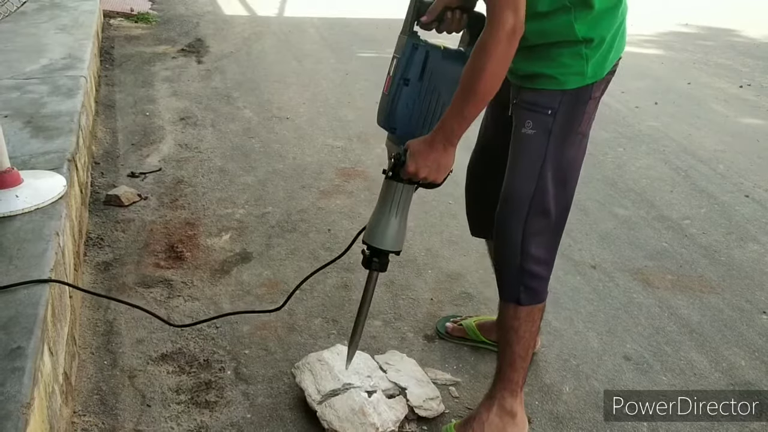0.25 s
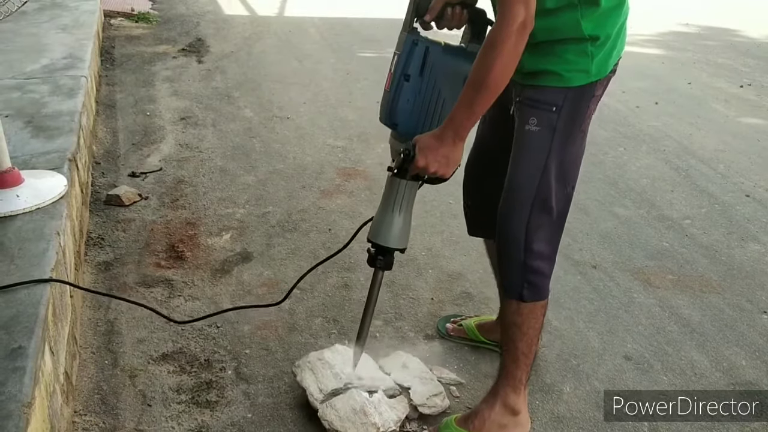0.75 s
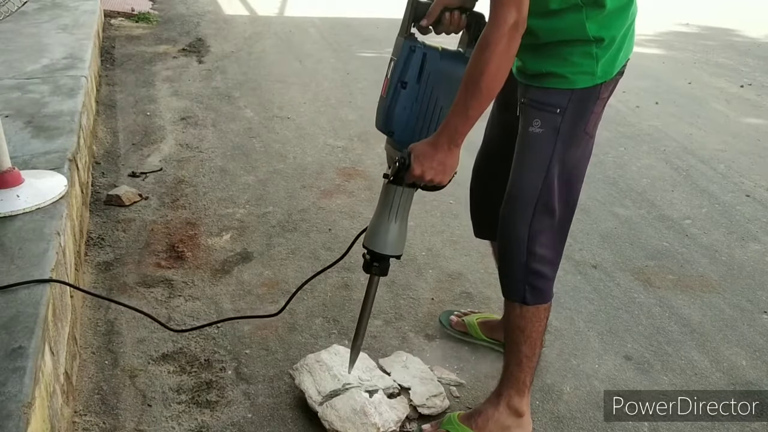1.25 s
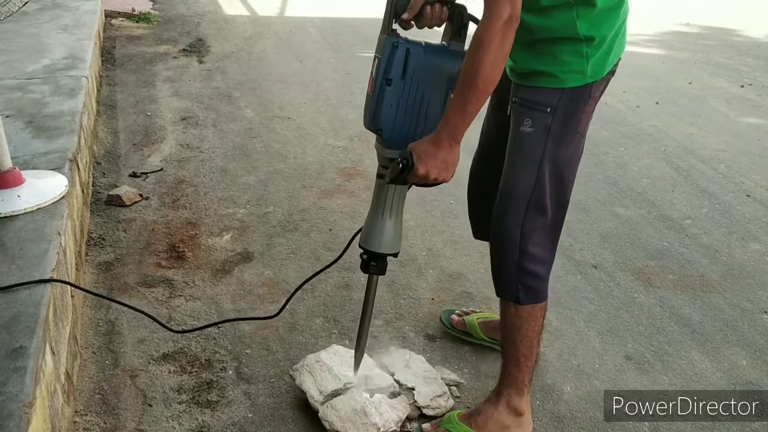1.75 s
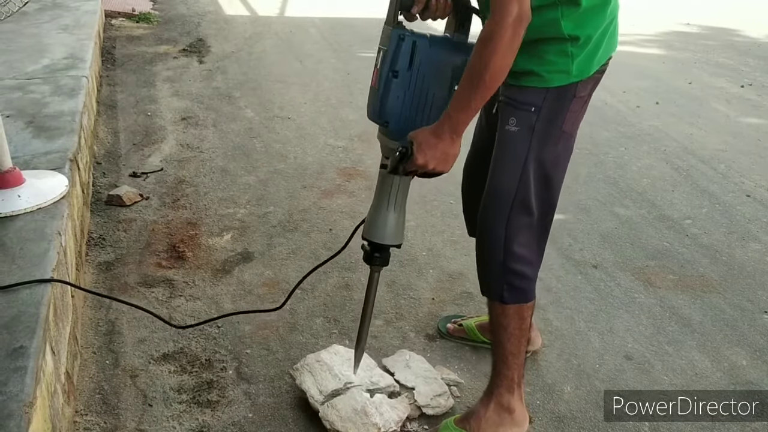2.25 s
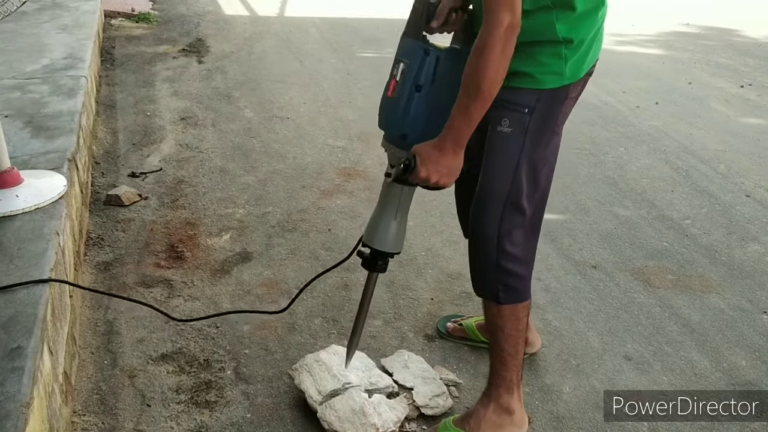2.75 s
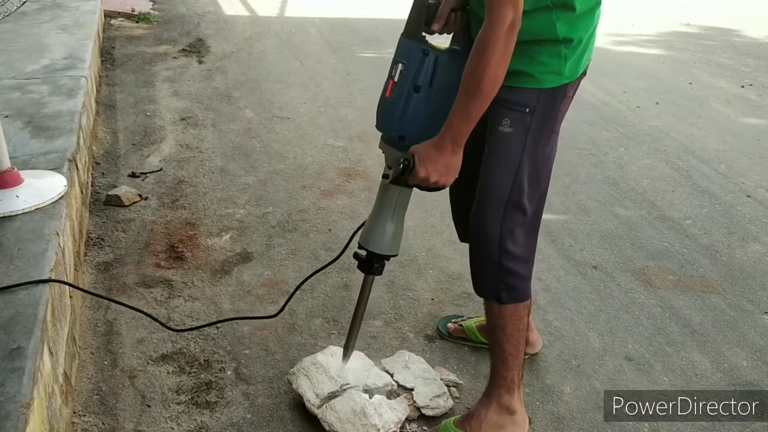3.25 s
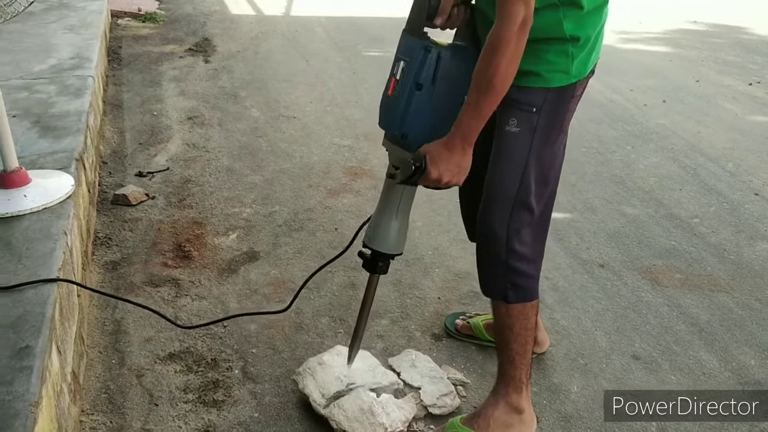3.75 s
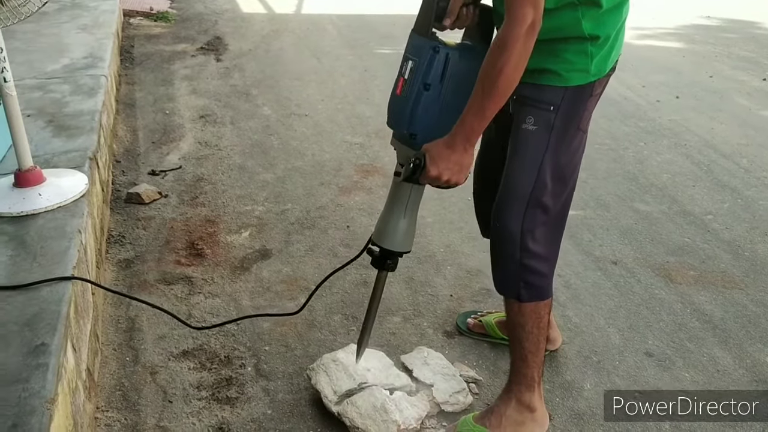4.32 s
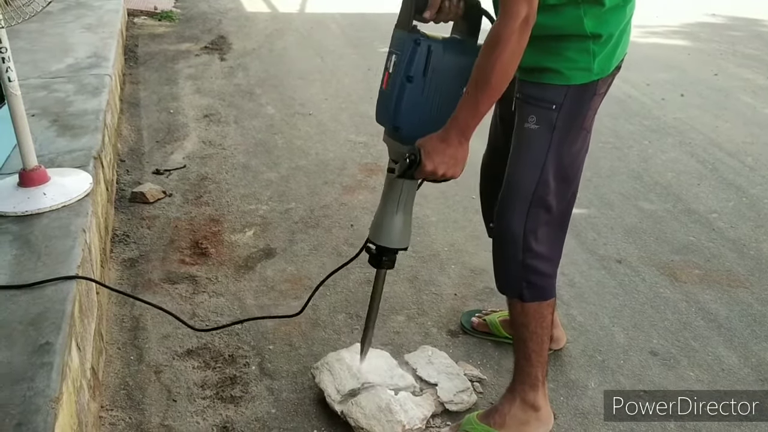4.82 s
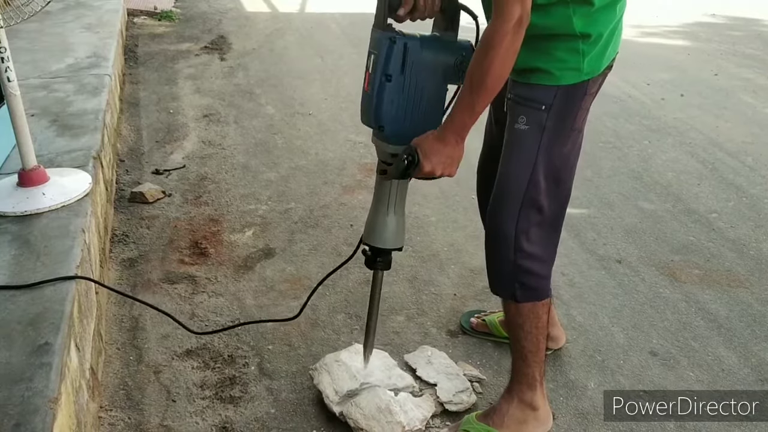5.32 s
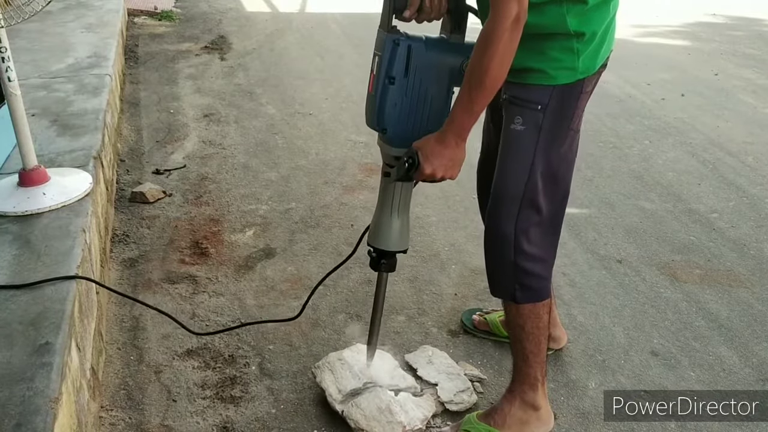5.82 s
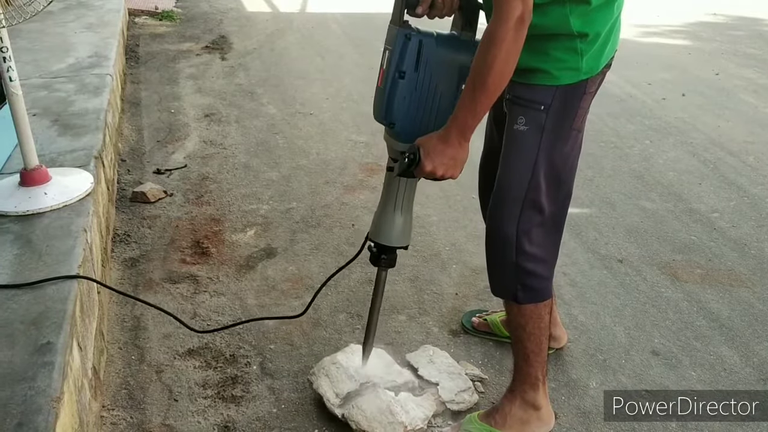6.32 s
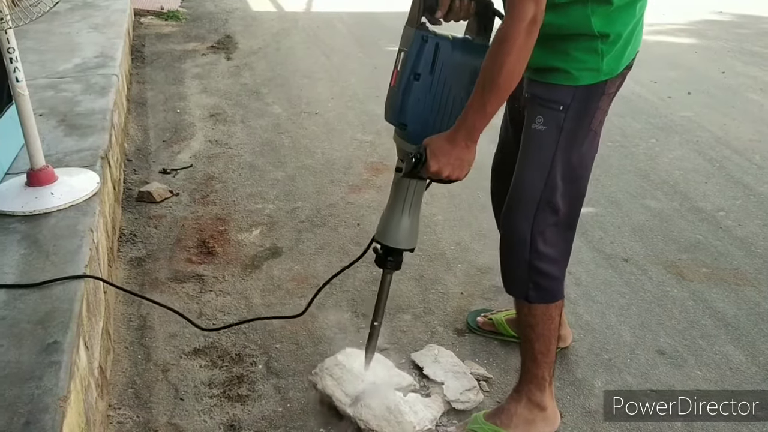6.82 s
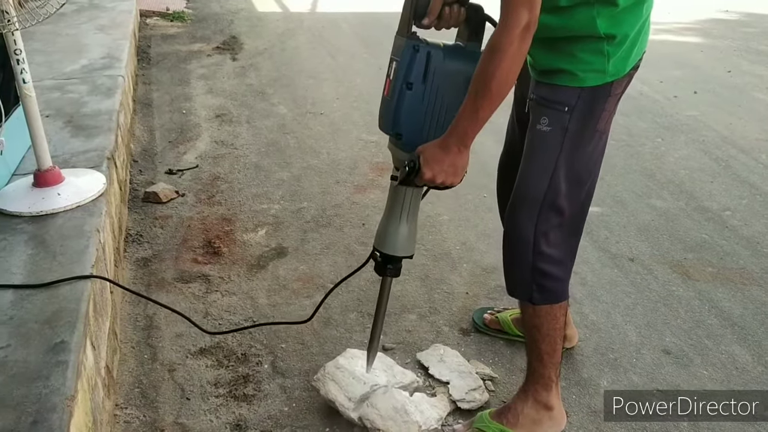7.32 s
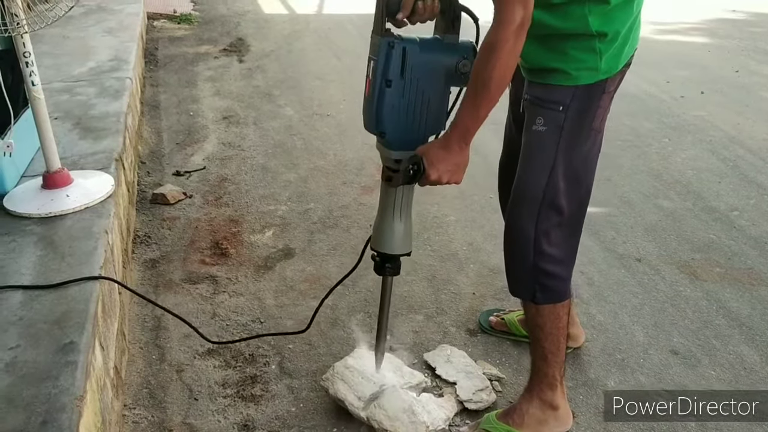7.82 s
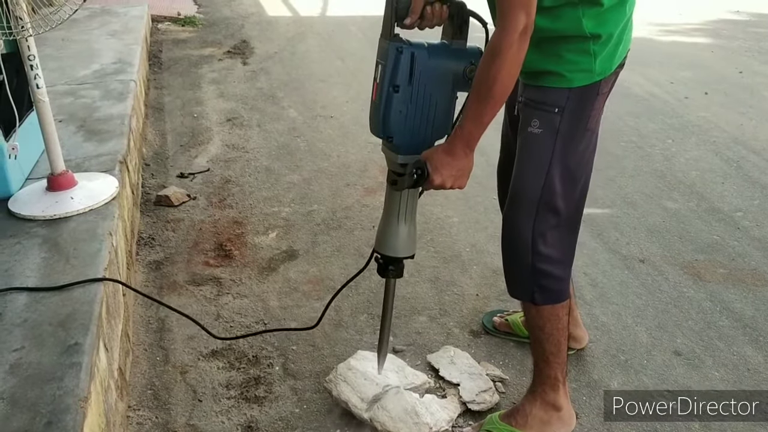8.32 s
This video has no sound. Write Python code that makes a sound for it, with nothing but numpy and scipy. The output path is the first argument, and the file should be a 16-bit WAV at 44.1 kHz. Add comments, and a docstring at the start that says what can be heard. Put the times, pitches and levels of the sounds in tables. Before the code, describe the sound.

A loud electric demolition hammer starts at once, close by outdoors: sharp steel-on-stone cracks, short midrange thuds, low ground thumps and a high clanging chisel ring, above a rough buzzing motor roar. The first few blows are spaced, quicken to over twenty per second around 0.5, then slow and lapse near 1.2. A short rising gear whine at 1.5 brings another burst, which spreads out and dies by 2.4. In the gap, echoes fade to faint air; the tool knocks lightly on the block at about 2.65. A tiny click and whine at 3.0 lead into the longest run, dense and irregular, until blows slow at 7.0 to 7.3. It surges again from 7.4, sags around 8.2, whines and picks up until cut off at about 8.6. Sparse wall echoes trail everything; overload roughens the peaks, with brighter treble on the right.

```python
"""An electric demolition hammer pounds a masonry block beside a low wall, its blows coming in uneven bursts.
Each blow is a noise crack, a short sine thud with echoes, a ground thump and decaying chisel modes, which
are damped as the tip reseats. Coloured noise is the roar of the motor; broken tones are the gear whine.
Sparse echoes and faint air lie behind. The right microphone faces the tool; the input overloads."""
import sys
import numpy as np
from scipy import signal
from scipy.fft import rfft, irfft, next_fast_len
from scipy.io import wavfile
from scipy.ndimage import uniform_filter1d

SR = 44100
rng = np.random.default_rng(int(sys.argv[2]) if len(sys.argv) > 2 else 0)


def wav_out(sig):
    """Save sig, one row per channel (or a flat mono array), as 16-bit PCM at SR to the path in sys.argv[1]."""
    wavfile.write(sys.argv[1], SR, np.round(np.clip(np.atleast_2d(sig).T, -1, 1) * 32767).astype(np.int16))


N = 377937


def amp(db):
    """Decibels to gain."""
    return 10 ** (np.asarray(db) / 20)


def evened(x):
    """Scales to rms 1."""
    return x / np.sqrt(np.mean(x ** 2) + 1e-20)


def read(points, hz):
    """Reads a curve on a log-frequency axis."""
    f, value = np.transpose(points)
    return np.interp(np.log(hz + 1), np.log(f + 1), value)


def add(mix, s, sound):
    """Mixes a sound in at time s, channel by channel."""
    part = mix[:, max(round(s * SR), 0):][:, :sound.shape[1]]
    part += sound[:, :part.shape[1]]


# left-right likeness of noise: [f/Hz, likeness/1]
LIKENESS = [(60, 0.13), (180, 0.8), (550, 0.52), (1650, 0.096), (4970, 0.45), (15000, 0.019)]


def hiss(colour_db, patchy_db, size):
    """Two partly alike channels of noise; colour_db(hz, t) sets the level, random patches roughen it."""
    hop = size // 4
    frames = N // hop + 5
    hz = np.fft.rfftfreq(size, 1 / SR)[:, None]
    a, b, c, d, patches = rng.standard_normal((frames, len(hz), 5)).T
    patches = uniform_filter1d(patches, size=5, axis=0)
    patches = evened(uniform_filter1d(patches, size=7, axis=1))
    same = np.clip(read(LIKENESS, hz), -1, 1)
    left = a + 1j * b
    right = same * left + np.sqrt(1 - same ** 2) * (c + 1j * d)
    level_db = colour_db(hz, np.arange(frames) * hop / SR) + patchy_db * patches
    z = np.array([left, right]) * amp(level_db)
    return signal.istft(z, nperseg=size, noverlap=size - hop)[1][:, :N]


HIT_T = np.arange(5000) / SR  # s, time axis of one hit


def reseating_db(free_s):
    """The stone damps the steel once the tip bears again: a drop of 11 dB, then 265 dB/s."""
    drop_db = -11 / (1 + np.exp(-(HIT_T - free_s) / 0.001))
    return drop_db - 265 * np.maximum(HIT_T - free_s, 0)


TICK_DB, TICK_S = -4, 0.00049  # first contact of the tip, re crack


def crack_envelope(crack_db, top_db, dull_db, reseat_db):
    """Crack of steel on stone as a burst, a tick and a tail; loose steel clatters while the chisel rings."""
    t = HIT_T
    burst = np.exp(-(t / 0.0032) ** 2) * np.minimum(t / 0.0012, 1)
    tick = amp(TICK_DB) * np.exp(-((t - 0.001) / TICK_S) ** 2)
    tail = amp(-6) * np.exp(-t / 0.0099)
    clatter = amp(top_db - 9 + dull_db + reseat_db) * (1 - np.exp(-t / 0.0012))
    return (amp(crack_db) * (burst + tick + tail) + clatter)[None]


# chisel modes, low to high: [f/Hz]
MODE_HZ = [2455, 4260, 4400, 6310, 6480, 7235, 8606, 8720, 10300, 11260, 11380, 14250, 14845]
# same modes: [level/dB, free t60/s]
MODES = [(9, 0.053), (-15.5, 0.1), (7, 0.097), (-3.5, 0.19), (1, 0.074), (-4.5, 0.72), (-6, 0.24),
         (5, 0.052), (-42, 0.078), (-8.5, 0.081), (-5, 0.46), (-2.5, 0.39), (-2, 0.44)]
# family of each mode: [index/1]
MODE_FAMILY = [0, 1, 1, 2, 2, 3, 4, 4, 5, 5, 5, 6, 6]
# each family re the loudest, low to high: [level/dB]
FAMILY_LEVEL_DB = [-19.5, -16.5, -7, -8.5, -8, -8, -9.5]
FAVOUR_OCTAVES, SCATTER_DB = 0.051, 3.5  # width around a favoured pitch; chance spread of the other families
NEXT_DB = -2.5  # next loudest pitch re the loudest
WEAK_DULL = 0.54  # dB/octave of tilt for each dB that a ring is below -16 dB


def chisel_ring(top_db, top_hz, next_hz, dull_db_per_octave, reseat_db):
    """Steel rod modes: decaying sines, most of their level near two favoured pitches."""
    t, mode_hz = HIT_T, np.c_[MODE_HZ]
    mode_db, mode_t60 = np.transpose(MODES)[:, :, None]
    detune, rattle_rate, rattle_phase = rng.standard_normal((3, len(mode_hz), 1))
    first, second = (np.exp(-(np.log2(mode_hz / hz) / FAVOUR_OCTAVES) ** 2) for hz in (top_hz, next_hz))
    tilt = dull_db_per_octave + WEAK_DULL * min(top_db + 16, 0)
    tilt_db = tilt * np.log2(np.maximum(mode_hz, 4000) / 4000)
    families_db = np.c_[FAMILY_LEVEL_DB]
    families_db = families_db + SCATTER_DB * rng.standard_normal(families_db.shape)
    others_db = families_db[MODE_FAMILY] + tilt_db
    favoured_db = top_db + (1 - first) * (second * NEXT_DB + (1 - second) * others_db)
    # the shank chatters in its chuck
    rattle_db = 4.7 * np.sin(2 * np.pi * (71 * np.exp(0.33 * rattle_rate) * t + rattle_phase))
    level_db = favoured_db + mode_db + reseat_db + rattle_db - 60 * t / mode_t60
    turn = 2 * np.pi * mode_hz * (1 + 0.00323 * detune) * t  # the grip on the tip shifts each mode a little
    rise = 1 - np.exp(-t / 0.0028)
    sides = []
    for lean_db in (-2.85, 2.85):  # each microphone sees another part of the rod, more on the right
        strength, phase = rng.standard_normal((2, len(mode_hz), 1))
        ring = amp(level_db + 2.43 * strength + lean_db) * np.sin(turn + 2 * np.pi * phase)
        sides.append(ring.sum(0) * rise)
    return np.array(sides)


THUD_HZ, THUD_S = 1049, 0.00328  # about 3.4 cycles as the shock crosses the block


def block_thud(thud_db):
    """Shock in the block: a flat-topped sine burst of scattered pitch, with a very faint remainder."""
    shape = np.sin(np.pi * np.minimum(HIT_T / THUD_S, 1)) ** 0.15
    hz = THUD_HZ * (1 + 0.066 * rng.standard_normal())
    return amp(thud_db) * shape[None] * np.sin(2 * np.pi * hz * HIT_T)


# thud off wall, kerb and ground: [delay t/s, level/dB]
THUD_ECHOES = [(.0065, -16), (.012, -10.5), (.016, -14), (0.022, -11), (.027, -17), (0.033, -14),
               (.04, -17.5)]


def near_echoes(thuds):
    """Direct thud at 1.2 ms plus its discrete reflections."""
    paths = np.zeros((1, 2000))
    for delay_s, db in [(0.0012, 0)] + THUD_ECHOES:
        add(paths, delay_s, amp([[db]]))
    return signal.oaconvolve(thuds, paths)[:, :N]


# slab and soil under the block: [f/Hz, level/dB, t60/s]
GROUND_MODES = [(228, -2, 0.1), (311, 2, 0.02), (586, -15, 0.33)]
THUMP_FOLLOWS, THUMP_SCATTER_DB = 0.24, 3  # dB per dB of thud; chance spread
WEAK_THUMP = 0.41  # dB less thump for each dB that a ring is below -11.5 dB


def ground_thump(share_db, thud_db, top_db):
    """The ground takes a share of each thud: decaying sines, alike in both channels."""
    hz, mode_db, t60 = np.transpose(GROUND_MODES)[:, :, None]
    thump_db = share_db + THUMP_FOLLOWS * (thud_db + 10) + WEAK_THUMP * min(top_db + 11.5, 0)
    thump_db += THUMP_SCATTER_DB * rng.standard_normal()
    turn = 2 * np.pi * hz * (1 + 0.0195 * rng.standard_normal(hz.shape)) * HIT_T
    thump = amp(thump_db + mode_db - 60 * HIT_T / t60) * np.sin(turn)
    return thump.sum(0) * np.ones((2, 1))


# crack noise spectrum, relative: [f/Hz, level/dB per Hz]
CRACK_COLOUR = [(150, -31), (400, -7), (1500, -4), (3000, -3), (5000, 0), (7000, -3), (10000, -6),
                (13000, -6.5), (14600, -7), (15500, -9)]
# blows, and a faint trigger click at 2.983 s:
# [t/s, crack level/dB, thud level/dB, ring level/dB, loudest f/Hz, next loudest f/Hz, reseat delay/s]
BLOWS_AND_CLICK = [(0.0214, -13.0, -12, -10.0, 8650, 6500, 0.017),
                   (0.0989, -28, -14.5, -5.5, 8650, 6390, 0.013),
                   (0.196, -10, -16.5, -14, 8650, 6350, 0.0096),
                   (0.3286, -10, -12, -14, 8650, 6390, 0.0074), (0.403, -16, -17, -9.5, 8650, 15100, 0.023),
                   (0.4542, -38, -7, -10, 8650, 6300, 0.029), (0.4978, -15, -23, -12.0, 14845, 8650, 0.039),
                   (0.544, -17, -12.5, -10.5, 6390, 7235, 0.015),
                   (0.5868, -16, -16, -11.5, 8650, 6340, 0.016), (0.631, -17, -19, -13, 8650, 14845, 0.021),
                   (0.6744, -14.0, -21, -12.0, 8650, 6390, 0.019),
                   (0.7243, -22, -11.5, -7.5, 8650, 6460, 0.022),
                   (0.783, -27, -33, -10.0, 8650, 6300, 0.022), (0.851, -17, -11, -10, 14250, 14845, 0.01),
                   (0.9272, -11.5, -13.5, -12.5, 8650, 6340, 0.022),
                   (1.026, -12, -14.5, -13, 8650, 11320, 0.011),
                   (1.1607, -11.5, -13.5, -25, 6390, 8650, 0.014),
                   (1.1773, -20, -14, -27, 6390, 4370, 0.015), (1.4253, -14.0, -19, -30, 2455, 6390, 0.023),
                   (1.4887, -27.0, -31.0, -22.0, 2455, 6390, 0.0092),
                   (1.5006, -14.5, -30, -20, 6390, 2455, 0.0065),
                   (1.556, -13, -11.5, -12, 11320, 4400, 0.036),
                   (1.6102, -8.5, -16, -12, 6390, 11320, 0.015),
                   (1.6578, -15, -8.5, -8, 8650, 14250, 0.017), (1.7, -6, -10.5, -11, 8650, 6390, 0.035),
                   (1.7465, -22, -17, -10.0, 7235, 6390, 0.024),
                   (1.785, -35, -34.0, -23, 6390, 7235, 0.014),
                   (1.799, -27, -11, -13.5, 7235, 14400, 0.012), (1.856, -11, -24, -12, 7235, 8650, 0.014),
                   (1.925, -13.5, -18.0, -12.5, 11320, 7235, 0.019),
                   (2.0064, -9, -13, -13.5, 8650, 6390, 0.012),
                   (2.108, -10.0, -39, -14.5, 8650, 11400, 0.013),
                   (2.2478, -12.5, -26, -22.0, 6390, 7235, 0.011),
                   (2.31, -39, -44, -33.0, 7235, 6500, 0.11), (2.4104, -17, -55, -20, 6390, 7235, 0.017),
                   (2.983, -35, -42, -35, 8650, 7150, 0.008), (2.9903, -29, -23, -51, 6390, 8650, 0.018),
                   (3.0053, -33.0, -37, -30, 2455, 6360, 0.021), (3.027, -14, -37, -25, 6390, 8650, 0.014),
                   (3.0832, -10.5, -18.0, -10.5, 6390, 7235, 0.019),
                   (3.1373, -10, -12, -10.5, 6390, 14170, 0.017),
                   (3.1832, -9, -16, -12, 14845, 6390, 0.017),
                   (3.2272, -10, -7.5, -7.5, 11320, 6430, 0.016),
                   (3.2693, -10, -16, -14.5, 6390, 7235, 0.024),
                   (3.3159, -10.5, -13.5, -16.5, 7235, 8650, 0.025),
                   (3.3619, -30, -7.5, -8.5, 8650, 4400, 0.038),
                   (3.4198, -12, -24, -15, 8650, 11320, 0.018),
                   (3.4839, -14.0, -9.5, -11.0, 6390, 8690, 0.023),
                   (3.5464, -13.0, -8, -11, 6390, 14250, 0.014),
                   (3.5973, -9.5, -13.0, -10, 14250, 15000, 0.018),
                   (3.641, -17, -14, -11, 14250, 6300, 0.021), (3.685, -10, -8.5, -13, 14250, 6400, 0.03),
                   (3.725, -16.0, -7.5, -10.5, 11320, 14250, 0.016),
                   (3.7642, -7.5, -20, -16.5, 14250, 7235, 0.036), (3.811, -6, -28, -15, 6390, 7235, 0.016),
                   (3.854, -20, -10, -6.5, 4330, 11320, 0.017),
                   (3.8849, -12, -8.5, -12.5, 8650, 14250, 0.042),
                   (3.9216, -16, -13, -10, 14250, 14845, 0.027), (3.9669, -9, -20, -17, 7235, 2455, 0.034),
                   (4.0092, -12, -20, -18, 7235, 4400, 0.023), (4.0449, -12, -14, -12.5, 11320, 7235, 0.03),
                   (4.0852, -13.0, -12.5, -11.0, 14250, 14845, 0.023),
                   (4.132, -14, -7.5, -11.5, 7235, 8650, 0.024),
                   (4.1805, -10, -12.5, -11.5, 8650, 6390, 0.026),
                   (4.224, -32, -35, -20, 6390, 7235, 0.019), (4.2393, -10.5, -37, -10, 14250, 7235, 0.019),
                   (4.3014, -16, -14.0, -9, 6390, 14700, 0.026),
                   (4.353, -36, -33.0, -18.5, 6390, 8650, 0.026),
                   (4.375, -28, -7.5, -11.5, 14845, 14400, 0.028),
                   (4.4641, -7, -10.5, -14, 8650, 6390, 0.031), (4.5444, -17, -9, -6, 11320, 8550, 0.031),
                   (4.5975, -21, -11.5, -8.5, 6390, 11400, 0.024),
                   (4.642, -9.5, -11.5, -14, 8650, 14845, 0.028),
                   (4.6839, -15, -13.0, -10, 14845, 7235, 0.049),
                   (4.728, -19, -18, -12.5, 7235, 6390, 0.061),
                   (4.7708, -11.0, -14.5, -12.5, 6390, 7235, 0.032),
                   (4.8146, -7, -16, -14.0, 7235, 6390, 0.017),
                   (4.8562, -11, -17.0, -20, 6390, 7200, 0.016),
                   (4.8913, -11.5, -18.0, -14.5, 7235, 6430, 0.019),
                   (4.9297, -8, -17.0, -15, 7235, 8400, 0.021),
                   (4.9691, -13.0, -33, -13, 6390, 7235, 0.013),
                   (5.009, -12, -12.5, -13, 14845, 6350, 0.02),
                   (5.0514, -9.5, -13.0, -11, 14845, 6450, 0.039), (5.099, -20, -9, -8, 7235, 14845, 0.031),
                   (5.1537, -11, -26.0, -16.5, 7235, 6390, 0.033),
                   (5.218, -10.5, -6, -13.5, 7235, 11150, 0.029),
                   (5.2774, -19.0, -5, -10.5, 11320, 7235, 0.034),
                   (5.3258, -17, -8.5, -8.5, 7235, 14845, 0.02),
                   (5.3746, -10.5, -22, -14.5, 7235, 8650, 0.026),
                   (5.428, -10.5, -21, -15.5, 6390, 7235, 0.015),
                   (5.4874, -11.0, -9, -10, 6390, 4360, 0.025), (5.5565, -19, -8, -10, 14845, 14100, 0.025),
                   (5.6163, -17, -8, -11.5, 4330, 7235, 0.022), (5.663, -12, -12, -7.5, 6390, 8650, 0.03),
                   (5.7089, -26, -5.5, -11, 14845, 7235, 0.04),
                   (5.7509, -13.0, -9.5, -12, 6390, 8650, 0.039),
                   (5.7914, -27, -8.5, -8.5, 7235, 8800, 0.025),
                   (5.834, -12, -14, -12.5, 14250, 14845, 0.03),
                   (5.878, -15, -15, -15.0, 7235, 8650, 0.029),
                   (5.9176, -11, -7.5, -17.5, 6390, 7235, 0.018),
                   (5.9544, -10, -11, -11.5, 7235, 6500, 0.027),
                   (5.997, -14, -18.0, -14, 7235, 8650, 0.015),
                   (6.0388, -15.0, -12.0, -13, 6390, 14880, 0.0084),
                   (6.074, -10, -11.5, -14, 6390, 14845, 0.015),
                   (6.1142, -5.5, -13, -17.5, 8650, 6440, 0.024),
                   (6.1477, -12, -9.5, -7, 6390, 8700, 0.027), (6.185, -14, -28, -12.5, 7235, 6390, 0.033),
                   (6.2304, -7, -8, -18, 7235, 8680, 0.056), (6.2676, -11, -26.0, -13.5, 6390, 7235, 0.029),
                   (6.305, -14, -8.5, -13, 11320, 6390, 0.024),
                   (6.338, -6.5, -12.5, -16, 4330, 14250, 0.038),
                   (6.3808, -7, -17.0, -13, 8650, 7235, 0.033),
                   (6.422, -7, -13.0, -10.5, 8650, 4330, 0.035),
                   (6.4595, -26, -7.5, -10.5, 14845, 7235, 0.04),
                   (6.5019, -12, -7.5, -9.5, 8650, 14100, 0.052),
                   (6.5398, -13, -20.0, -13, 7235, 6440, 0.042),
                   (6.5927, -12, -18.0, -14.5, 7235, 8650, 0.03),
                   (6.6323, -10, -17.0, -12.0, 7235, 6390, 0.021),
                   (6.6733, -9.5, -15.0, -15, 7235, 14845, 0.026),
                   (6.717, -10.0, -22.0, -14, 6390, 14250, 0.023),
                   (6.7677, -8, -28, -16, 14845, 14250, 0.031), (6.8243, -12, -8, -12, 6390, 4330, 0.02),
                   (6.8845, -20, -9, -6.5, 4330, 8600, 0.025),
                   (6.9628, -16, -7.5, -10.5, 7235, 14250, 0.011),
                   (7.0504, -16.0, -12.5, -11, 6390, 7235, 0.026),
                   (7.1674, -7.5, -20.0, -15, 6390, 7235, 0.0079),
                   (7.3441, -13.5, -14.5, -17, 7235, 8650, 0.008),
                   (7.3632, -20, -17, -35, 2455, 6400, 0.048), (7.409, -11, -31, -29, 6390, 4330, 0.009),
                   (7.4518, -33, -41, -32.0, 7235, 2455, 0.015), (7.465, -19, -7, -10.5, 7235, 6390, 0.045),
                   (7.5196, -25, -10, -9, 7235, 14220, 0.027), (7.5643, -21, -8, -11, 14250, 7300, 0.027),
                   (7.6069, -13, -14.5, -13, 7235, 8650, 0.023),
                   (7.6514, -5.5, -24, -12, 7235, 6390, 0.023), (7.6965, -6, -13, -14.5, 4330, 7235, 0.056),
                   (7.7326, -9.0, -16, -10.5, 8650, 6390, 0.035),
                   (7.7795, -8, -18.0, -16, 7235, 6390, 0.023),
                   (7.8287, -10.0, -20.0, -11.5, 7235, 6390, 0.018),
                   (7.887, -18, -12, -8, 6390, 11400, 0.027), (7.9528, -7.5, -13, -10.5, 6390, 8650, 0.02),
                   (8.031, -17, -13.5, -11.5, 7235, 8650, 0.026),
                   (8.1248, -7.5, -13.5, -15, 7235, 6390, 0.015),
                   (8.2515, -10.5, -15.0, -27, 7235, 8550, 0.009),
                   (8.2683, -12, -20, -31.0, 7235, 6390, 0.015),
                   (8.3516, -22, -31.0, -25, 6390, 7235, 0.031),
                   (8.3809, -13, -10.5, -10.5, 8650, 7235, 0.032),
                   (8.4391, -9, -7.5, -10.5, 8650, 6390, 0.02), (8.4853, -15, -9, -8.5, 7235, 8650, 0.041),
                   (8.5298, -22, -5.5, -11.5, 7235, 8700, 0.021)]
# idle tool set down on the block: same columns
KNOCK_LIST = [(2.6275, -57, -21.0, -22.5, 2455, 4320, 0.011), (2.67, -14.5, -33, -30, 6390, 7235, 0.018),
              (2.6857, -10, -14, -18, 4300, 6390, 0.0083), (2.6926, -31, -14.5, -13.5, 2455, 6500, 0.014)]
THUMP_DB, KNOCK_THUMP_DB = -33.5, -19.5  # base thump of blow or click, of knock
KNOCK_DULL_DB = -2.5  # knock: ring tilt/dB per octave, also clatter offset/dB


def hammering():
    """Blows, a faint trigger click and knocks: crack, thud, thump and ring, each from 1 ms ahead of its t."""
    out, thuds, envelope = np.zeros((2, N)), np.zeros((1, N)), np.zeros((1, N))
    crack = evened(hiss(lambda hz, t: read(CRACK_COLOUR, hz) + 0 * t, patchy_db=4, size=512))
    hits = [(row, THUMP_DB, 0) for row in BLOWS_AND_CLICK]
    hits += [(row, KNOCK_THUMP_DB, KNOCK_DULL_DB) for row in KNOCK_LIST]
    for row, share_db, dull_db in hits:
        s, crack_db, thud_db, top_db, top_hz, next_hz, free_s = row
        start = s - 0.001
        reseat_db = reseating_db(free_s)
        add(envelope, start, crack_envelope(crack_db, top_db, dull_db, reseat_db))
        add(out, start, chisel_ring(top_db, top_hz, next_hz, dull_db, reseat_db))
        add(thuds, start, block_thud(thud_db))
        add(out, start, ground_thump(share_db, thud_db, top_db))
    return out + crack * envelope + near_echoes(thuds)


# roar spectrum, relative: [f/Hz, level/dB per Hz]
ROAR_COLOUR = [(100, -36), (220, -6.5), (600, -10.5), (1500, -2.5), (3500, 3), (5500, -5), (6600, 2),
               (8900, -4), (10000, -13.5), (13300, -10), (14600, -8), (15800, -19)]
# casing resonances: [f/Hz, width/Hz, level/dB]
CASING = [(220, 26, 13), (568.3, 21, 17.5), (946, 420, 15)]
# crank speed under a pulsed trigger: [t/s, speed/turns per s]
CRANK_SPEED = [(0, 11.3), (.33, 9.5), (.36, 7), (.6, 18.6), (.9, 13), (1.25, 5.6), (1.46, 1.3), (1.49, 8.6),
               (1.7, 20), (1.95, 11), (2.28, 11.3), (2.45, 0.56), (2.98, 0.55), (3.0, 2.8), (3.06, 12),
               (3.2, 16.3), (3.45, 13.6), (3.8, 15), (4.45, 14.3), (4.8, 13.4), (5.5, 14.5), (5.8, 17),
               (6.4, 16.2), (6.7, 14.4), (7.1, 12.3), (7.4, 8.9), (7.62, 16), (8.1, 11.4), (8.33, 8.2),
               (8.57, 18)]
ROAR_DB, QUIET_BELOW = -21.5, 4.14  # roar limit at high speed; fades below this speed/turns per s
DULL_DB, BRIGHTEN_DB = -1.5, 0.3033  # tilt at rest/dB per octave; its rise per turn/s


def motor():
    """Roar of fan, brushes and gears through the casing, brighter with speed; it keeps the chisel singing."""
    s, speed = np.transpose(CRANK_SPEED)

    def colour_db(hz, t):
        """Roar tilted about 2 kHz, with a peak at each resonance."""
        singing = sum(amp(db + FAMILY_LEVEL_DB[k] + 7) / (1 + ((hz - f) / 135) ** 2)
                      for f, (db, t60), k in zip(MODE_HZ, MODES, MODE_FAMILY))
        casing = sum(amp(db) / (1 + (2 * (hz - f) / width) ** 2) for f, width, db in CASING)
        peaks_db = 20 * np.log10(1 + singing + casing)
        tilt_db = DULL_DB + BRIGHTEN_DB * np.interp(t, s, speed)
        return read(ROAR_COLOUR, hz) + peaks_db + tilt_db * np.log2(np.maximum(hz, 800) / 2000)

    now = np.interp(np.arange(N) / SR, s, speed)
    roar = evened(hiss(colour_db, patchy_db=5.5, size=1024))
    return roar * amp(ROAR_DB) * now / np.hypot(now, QUIET_BELOW)


# gear whines as the motor takes up load: [t/s, length/s, f/Hz at 70 % of length, level/dB]
GEAR_WHINES = [(0.329, 0.083, 2220, -28.5), (1.473, 0.089, 2170, -19.5), (3.006, 0.081, 2186, -23),
               (7.403, 0.06, 2133, -22), (8.317, 0.068, 2224, -27.5)]
WHINE_RISE = 0.08  # share by which each whine climbs


def gears():
    """Rough, climbing tone that swells late, plus a tone at a third of its pitch."""
    out = np.zeros((2, N))
    for s, length_s, hz, db in GEAR_WHINES:
        t = np.arange(0, length_s, 1 / SR)
        noises = rng.standard_normal((2, 8000))
        drift, grind = (evened(uniform_filter1d(v, size=180))[:len(t)] for v in noises)
        pitch_hz = hz * (1 + 0.03 * drift + WHINE_RISE * (t / length_s - 0.7))
        turn = 2 * np.pi * np.cumsum(pitch_hz) / SR
        upper = np.sin(turn) * np.sin(np.pi * (t / length_s) ** 2.5)
        lower = amp(-8) * np.sin(turn / 3) * np.sin(np.pi * t / length_s)
        add(out, s, amp(db + 4 * grind) * (upper + lower) * np.ones((2, 1)))
    return out


# decay of the yard: [f/Hz, t60/s]
YARD_T60 = [(200, 0.89), (900, 1), (2500, 0.5), (6000, 0.58), (12000, 0.6)]


def yard(x):
    """Sparse echoes from walls and ground, each band dying at its own speed."""
    taps = np.zeros((2, SR))
    at = np.arange(300, SR - 20, 20) + rng.integers(0, 20, (2, (SR - 301) // 20))
    np.put_along_axis(taps, at, rng.choice([-1., 1.], at.shape), 1)
    hz, t, z = signal.stft(taps, SR, nperseg=256)
    decay = amp(-60 * t / read(YARD_T60, hz)[:, None])
    tail = signal.istft(z * decay, SR, nperseg=256)[1]
    return signal.fftconvolve(x, tail / np.linalg.norm(tail[0]), axes=1)[:, :N]


# street air spectrum, relative: [f/Hz, level/dB per Hz]
AIR_COLOUR = [(100, -9), (200, -3), (330, 4), (600, -4), (2000, -17), (6400, -44), (10000, -17),
              (15000, -38)]
AIR_DB = -47


def street_air():
    """Steady outdoor noise, mostly low."""
    noise = hiss(lambda hz, t: read(AIR_COLOUR, hz) + 0 * t, patchy_db=1, size=1024)
    return amp(AIR_DB) * evened(noise)


def scene():
    """The hammer, its echoes (the wall is on the left) and the street air."""
    tool = hammering() + motor() + gears()
    return tool + amp([[-7], [-11]]) * yard(tool) + street_air()


# left minus right, ahead of 3 dB more on the right: [f/Hz, level/dB]
LEFT_LEAN = [(130, -1), (500, -4), (1000, -2.5), (2400, -0.5), (4500, 1), (8000, -6), (11000, -8.5),
             (15000, -2.5)]
WIND_HZ, WIND_DB = 110, -71  # faint wind on each microphone
COUPLING_HZ, EDGE_HZ = 61.4, 15350  # bass cut after the overload; band limit


def record(dry):
    """Left shaded from the treble, bass cut, rounded-knee overload, a little wind, then the band limit."""
    size = next_fast_len(N)
    lean_db = read(LEFT_LEAN, np.fft.rfftfreq(size, 1 / SR))
    gains = amp([lean_db / 2 - 2.5, -lean_db / 2 + 0.5])
    heard = irfft(rfft(dry, size) * gains, size)[:, :N]
    heard = signal.sosfilt(signal.butter(5, 170, "high", fs=SR, output="sos"), heard)
    clipped = heard / (1 + abs(heard / 0.88) ** 5) ** (1 / 5)
    clipped = signal.lfilter(*signal.butter(1, COUPLING_HZ, "high", fs=SR), clipped)
    wind = signal.lfilter(*signal.butter(2, WIND_HZ, fs=SR), rng.standard_normal((2, N)))
    mixed = clipped + amp(WIND_DB) * evened(wind)
    edge = signal.firwin(151, EDGE_HZ, window=("kaiser", 8), fs=SR)
    return np.clip(signal.oaconvolve(mixed, edge[None], "same"), -1, 1)


dry = scene()
out = record(dry)
wav_out(out)
```